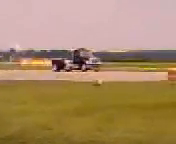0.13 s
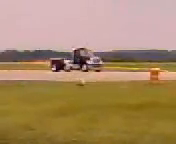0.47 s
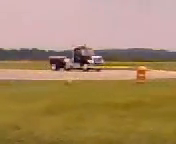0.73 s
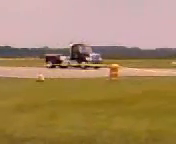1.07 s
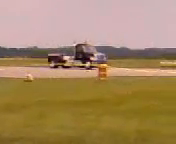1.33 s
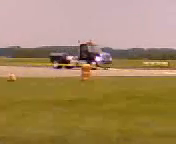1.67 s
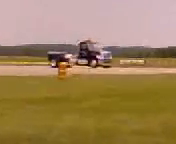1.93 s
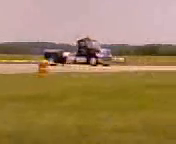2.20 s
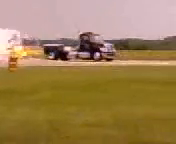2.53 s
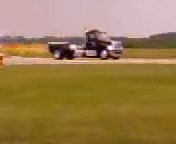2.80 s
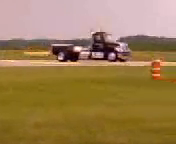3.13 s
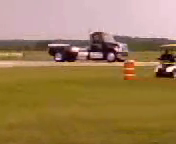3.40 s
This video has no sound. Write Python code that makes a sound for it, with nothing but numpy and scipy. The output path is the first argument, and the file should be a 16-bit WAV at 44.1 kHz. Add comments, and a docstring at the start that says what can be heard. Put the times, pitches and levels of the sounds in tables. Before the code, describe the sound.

Jet truck on an open airfield: a booming, popping afterburner burst under a high whine, then whine and hiss alone, then a second, rougher burst with stuttering whine, through a thin, overloaded microphone.

```python
"""A jet-engined truck rolls along a distant runway. From the start its compressor whines, as two wavering
tones, over filtered noise for the rushing air. Almost at once the afterburner lights with a bang: random
puffs of noise boom in the jet pipe and crackle for about a second. The whine and hiss carry on alone, then
at 2.6 s the flame lights again, and short surges of the tone make the whine stutter.
A narrow-band microphone clips on the loudest peaks."""
import sys
import numpy as np
from scipy import signal
from scipy.fft import rfft, irfft, next_fast_len
from scipy.io import wavfile
from scipy.ndimage import uniform_filter1d

SR = 44100
rng = np.random.default_rng(int(sys.argv[2]) if len(sys.argv) > 2 else 0)


def rack_gain(trim_db):
    """Turn a fader trim in dB into the linear factor to multiply a signal by."""
    fader = np.asarray(trim_db, float)
    return 10 ** (fader / 20)


def log_audio(samples):
    """Write samples as a 16-bit WAV file to the path given in sys.argv[1]."""
    # one column per channel
    frames = np.atleast_2d(samples).T
    # limit to full scale, then quantise
    limited = np.clip(frames, -1, 1)
    pcm = np.round(limited * 32767).astype(np.int16)
    wavfile.write(sys.argv[1], SR, pcm)


N = 157437  # length in samples, about 3.6 s


def curve(rows, column, off=None):
    """One column of a table, joined by straight lines in time; "off" is its value outside the table."""
    rows = np.array(rows, float)
    return np.interp(np.arange(N) / SR, rows[:, 0], rows[:, column], left=off, right=off)


def colour(x, points):
    """Shape x by (pitch_hz, level_db) points, falling steeply beyond the ends; rms 1."""
    points = np.array(points, float)
    size = next_fast_len(N + 4096)
    log_hz = np.log(np.maximum(np.arange(size // 2 + 1) * SR / size, 1))
    log_points = np.log(points[:, 0])
    below = np.maximum(log_points[0] - log_hz, 0)
    above = np.maximum(log_hz - log_points[-1], 0)
    # 81 dB per factor e in pitch is about 56 dB per octave
    shape_db = np.interp(log_hz, log_points, points[:, 1]) - 81 * (below + above)
    y = irfft(rfft(x, size) * rack_gain(shape_db), size)[:N]
    return y / np.sqrt(np.mean(y ** 2))


def walk(rate):
    """Slow chance changing about rate times a second; spread 1."""
    k = max(int(SR / rate), 2)
    w = uniform_filter1d(uniform_filter1d(rng.standard_normal(N), k), k)
    return w / w.std()


def noise():
    """Plain white noise, the raw stuff of rushing air and fire."""
    return rng.standard_normal(N)


# how loud the moving air is: start_s, hump_level_db (noise round the tone), hiss_level_db (above it)
AIR_LEVELS = [(0.0, -46, -29), (0.04, -22, -34), (0.18, -25.5, -37.5), (0.21, -26.5, -30.5),
              (0.59, -23.5, -33), (0.76, -22.5, -31), (0.98, -26.5, -30), (1.76, -25, -32),
              (1.77, -28.5, -34), (2.22, -24.5, -26.5), (2.44, -27.5, -31), (2.55, -36.5, -28),
              (2.6, -19, -30), (2.72, -25.5, -27.5), (2.97, -22, -25), (3.17, -22, -27.5),
              (3.22, -15.5, -20), (3.33, -21.5, -23), (3.37, -12.5, -23), (3.39, -25.5, -26.5),
              (3.56, -27.5, -26.5)]
# tone colour of the hump: pitch_hz, level_db (per Hz, relative)
HUMP_COLOUR = [(1500, -23.5), (1750, -5.5), (1950, 0.5), (2150, 8.5), (2350, 4), (2550, -14.5), (2900, -12)]
# tone colour of the hiss: pitch_hz, level_db (per Hz, relative)
HISS_COLOUR = [(2000, -15.5), (2400, -3), (2650, -1), (2850, 0), (3150, 0), (3400, -8), (3800, -19.5),
               (4200, -33)]
# how loud the jet is without its flame: start_s, level_db
DRY_JET_LEVELS = [(1.0, -39), (1.7, -39), (1.8, -37), (2.1, -39.5), (2.5, -36.5)]
# tone colour of that dry jet: pitch_hz, level_db (per Hz, relative)
DRY_JET_COLOUR = [(25, -23.5), (223, -18), (479, -15), (640, -12.5), (834, -9.5), (900, -12), (970, -8.5),
                  (1150, -10), (1450, -7), (1540, -0.5), (1640, -9.5), (1800, -9.5), (2340, -23)]
GUST_DB, HUMP_FLICKER_DB, JET_FLICKER_DB = 1.2 / 2, 1.2, 1.2


def air():
    """Turbulent intake noise heaped round the tone, hiss above it, a dull dry exhaust below."""
    gust = GUST_DB * walk(4.1)  # shared by hump and hiss
    hump_db = curve(AIR_LEVELS, 1) + gust + HUMP_FLICKER_DB * walk(51)
    hiss_db = curve(AIR_LEVELS, 2) + gust + 1.5 * walk(60) + 1.6 * walk(150)
    jet_db = curve(DRY_JET_LEVELS, 1) + JET_FLICKER_DB * walk(27)
    hump = rack_gain(hump_db) * colour(noise(), HUMP_COLOUR)
    hiss = rack_gain(hiss_db) * colour(noise(), HISS_COLOUR)
    dry_jet = rack_gain(jet_db) * colour(noise(), DRY_JET_COLOUR)
    return hump + hiss + dry_jet


# short surges of the blade tone while the flame burns: peak_s, peak_level_db, half_width_s
SURGES_OF_TONE = [(0.447, -14, 0.0022), (2.617, -6.5, 0.001), (2.915, -10, 0.0043), (3.132, -6, 0.0033),
                  (3.147, -11, 0.0043), (3.1521, -4.5, 0.0013), (3.158, -4.5, 0.0014), (3.165, -4, .002),
                  (3.176, -12, 0.0042), (3.191, -10.5, 0.0092), (3.2007, -3, 0.0035), (3.2148, -1.5, 0.002),
                  (3.226, -8, 0.0069), (3.238, -6, 0.0053), (3.25, -0.5, 0.0027), (3.2608, -3.5, 0.0022),
                  (3.273, -9.5, .004), (3.282, -2.5, 0.0023), (3.289, -5, 0.0016), (3.297, -2.5, 0.0014),
                  (3.304, -5.5, 0.0023), (3.3408, -5.5, 0.0013)]


def surges():
    """The whine stutters: bell-shaped swells, given as the strength of the added tone."""
    t = np.arange(N) / SR
    swells = np.zeros(N)
    for peak_s, level_db, half_width_s in SURGES_OF_TONE:
        swells += rack_gain(level_db) * np.exp(-((t - peak_s) / half_width_s) ** 2)
    return swells


# compressor speed, heard as its blade tone: start_s, pitch_hz
BLADE_PITCH = [(0, 2220), (0.2, 2212), (0.45, 2197), (0.7, 2180), (0.85, 2187), (1.0, 2204), (1.15, 2220),
               (1.35, 2224), (1.75, 2221), (2.1, 2214), (2.5, 2208), (2.7, 2199), (2.9, 2189), (3.15, 2175),
               (3.36, 2167), (3.57, 2187)]
# blade tone as it arrives through turbulent air: start_s, level_db (rms)
BLADE_LEVELS = [(0.0, -30), (0.04, -31), (0.075, -28.5), (0.14, -15), (0.18, -20.5), (0.21, -33),
                (0.24, -13), (0.27, -24.5), (0.29, -17.5), (0.37, -22.5), (0.39, -32), (0.44, -24.5),
                (0.45, -19.5), (0.488, -15), (0.55, -16), (0.64, -18), (0.69, -15), (0.81, -11.5),
                (0.822, -19), (0.835, -13), (0.97, -9.5), (1.05, -11.5), (1.08, -16.5), (1.11, -12.5),
                (1.24, -16), (1.26, -24), (1.32, -15.5), (1.37, -26), (1.4, -15.5), (1.44, -25.5),
                (1.52, -17.5), (1.57, -22.5), (1.585, -33), (1.6, -20.5), (1.73, -15.5), (1.77, -36),
                (1.87, -26.5), (1.95, -39), (2.0, -20.5), (2.03, -48), (2.05, -28.5), (2.21, -20.5),
                (2.4, -22.5), (2.47, -20.5), (2.51, -37), (2.55, -30), (2.57, -30), (2.69, -15.5),
                (2.74, -26.5), (2.77, -23), (3.01, -22.5), (3.03, -16.5), (3.1, -16.5), (3.12, -36),
                (3.305, -39), (3.322, -12), (3.37, -12.5), (3.4, -15), (3.47, -17.5), (3.52, -14),
                (3.56, -14.5)]
# weaker tone of a second blade row: start_s, level_db (rms)
SECOND_ROW_LEVELS = [(0, -53), (0.85, -47), (1.0, -34), (1.25, -41), (1.45, -46), (2.4, -40), (2.6, -37),
                     (2.75, -46), (3.0, -34), (3.15, -35), (3.27, -43), (3.34, -28), (3.39, -30),
                     (3.43, -27), (3.52, -41)]
SECOND_RATIO = 1.288  # pitch of the second tone over the first
BLADE_FLUTTER_DB, SECOND_FLUTTER_DB = 1.0, 2.5
BLADE_WOBBLE_RAD, SECOND_WOBBLE_RAD, SECOND_WOBBLES_PER_S = 0.067, 1.3, 140


def whine():
    """Two blade tones; the air on the way makes them flutter in level and phase."""
    phase = 2 * np.pi * np.cumsum(curve(BLADE_PITCH, 1)) / SR
    blade_tone = np.sin(phase + BLADE_WOBBLE_RAD * walk(44))
    blade_db = curve(BLADE_LEVELS, 1) + BLADE_FLUTTER_DB * walk(68) + 0.11 * walk(130)
    second_wobble = SECOND_WOBBLE_RAD * walk(SECOND_WOBBLES_PER_S)
    second_tone = np.sin(SECOND_RATIO * phase + second_wobble)
    second_db = curve(SECOND_ROW_LEVELS, 1) + SECOND_FLUTTER_DB * walk(53)
    steady = rack_gain(blade_db) * blade_tone + rack_gain(second_db) * second_tone
    return np.sqrt(2) * steady + surges() * blade_tone  # root 2 turns rms into peak


# the two burns of the afterburner, one list each: start_s, boom_level_db, crackle_level_db
BURNS = [
    [(0.03, -44, -41), (0.042, -21.5, -22), (0.158, -26, -30), (0.182, -22, -27), (0.228, -25, -31.5),
     (0.372, -28, -31.5), (0.38, -22.5, -32), (0.43, -25, -29), (0.55, -34, -37), (0.578, -34.5, -34),
     (0.676, -26.5, -27), (0.765, -29, -25), (0.806, -33.5, -32.5), (0.89, -45.5, -52), (0.95, -48.5, -70)],
    [(2.608, -29, -39), (2.618, -20, -24.5), (2.698, -25.5, -28), (2.76, -19.5, -26), (2.87, -31, -31.5),
     (2.944, -24, -29.5), (3.03, -25.5, -31.5), (3.06, -31, -42), (3.114, -26.5, -23.5),
     (3.13, -25.5, -34.5), (3.296, -24, -28), (3.368, -31, -35), (3.39, -30, -40), (3.418, -42.5, -43),
     (3.484, -38, -66), (3.56, -68, -59)],
]
# tone colour of jet pipe and open air: pitch_hz, level_db (per Hz, relative)
BOOM_COLOUR = [(21, -45), (35, -13), (97, -18.5), (166, -7), (206, -9), (264, 0.5), (396, -11.5),
               (430, -10), (600, -19), (780, -40.5)]
# tone colour of the crackle: pitch_hz, level_db (per Hz, relative)
CRACKLE_COLOUR = [(350, -7.5), (500, 2), (650, 3.5), (850, 7), (1100, 2), (1500, -1.5), (2200, -18.5),
                  (3200, -5.5), (4200, -40)]
POPS_PER_S, POP_SPREAD_DB, POP_MS = 430, 3, 5.3  # POP_MS: time for a puff's power to fall to 1/e
CRACKLE_GRAIN_DB = 3.5


def flame():
    """Uneven pockets of fuel burn as short puffs of pressure; they boom in the pipe and crackle on top."""
    pop_db = POP_SPREAD_DB * np.minimum(rng.exponential(size=N), 2.5)
    pops = (rng.random(N) < POPS_PER_S / SR) * rack_gain(pop_db)
    fade = np.exp(-1000 / (POP_MS * SR))  # power kept from one sample to the next
    power = signal.lfilter([1], [1, -fade], pops ** 2)
    puffs = np.sqrt(power) * rack_gain(0.84 * walk(21))
    boom = colour(puffs * noise(), BOOM_COLOUR)
    grain = rack_gain(CRACKLE_GRAIN_DB * walk(150))
    crackle = colour(puffs * grain * noise(), CRACKLE_COLOUR)
    fire = np.zeros(N)
    for burn in BURNS:
        fire += rack_gain(curve(burn, 1, off=-120)) * boom
        fire += rack_gain(curve(burn, 2, off=-120)) * crackle
    return fire


# loudest bangs of the flame: peak_s, peak_level_db, main_pitch_hz
FLAME_BANGS = [(0.043, -12.5, 414), (0.07, -11, 227), (0.095, -20.5, 260), (0.182, -23, 260),
               (0.203, -15.5, 298), (0.264, -16.5, 270), (0.315, -18.5, 261), (0.384, -22, 261),
               (0.434, -18, 243), (0.659, -20, 287), (0.708, -22.5, 256), (2.627, -23, 324),
               (2.727, -12, 259), (2.75, -9.5, 285), (2.772, -15, 238), (2.833, -18.5, 298),
               (2.849, -14, 260), (2.964, -18.5, 307), (3.0101, -11, 267), (3.055, -17.5, 286),
               (3.113, -15, 282), (3.263, -21.5, 277), (3.393, -28.5, 270)]
BANG_WIDTH_S = 0.007  # half-width of the swell
CRACK_DB, CRACK_LEAD_S, CRACK_FALL_S = -2, .005, .004  # CRACK_DB: gain on the smoothed noise


def bangs():
    """Each bang: a few cycles of the pipe that swell and die, with a sharp crack on the front."""
    out = np.zeros(N)
    half = SR // 30
    t = np.arange(-half, half) / SR
    for peak_s, level_db, pitch_hz in FLAME_BANGS:
        crack = rack_gain(CRACK_DB) * uniform_filter1d(rng.standard_normal(len(t)), size=8)
        # starts sharply just before the peak of the swell, then dies away
        crack *= (t > -CRACK_LEAD_S) * np.exp(-np.abs(t + CRACK_LEAD_S) / CRACK_FALL_S)
        swell = np.exp(-(t / BANG_WIDTH_S) ** 2) * np.sin(2 * np.pi * pitch_hz * t)
        i = int(peak_s * SR) - half
        out[i:i + len(t)] += rack_gain(level_db) * (swell + crack)
    return out


def scene():
    """All layers, one channel."""
    return (air() + whine() + flame() + bangs())[None]


def band_limit(x):
    """A steep low-pass at the top of the band."""
    return signal.sosfilt(signal.butter(12, 15800, fs=SR, output="sos"), x)


SATURATE_AT, CLIP_AT = 1, .7  # sample values; full scale is 1
TOP_HZ = 4300


def record(dry):
    """A softly saturating, narrow microphone with a steep top cut, then hard clipping of the highest peaks."""
    soft = SATURATE_AT * np.tanh(dry / SATURATE_AT)
    top_cut = signal.ellip(10, .3, 90, TOP_HZ, fs=SR, output="sos")
    narrow = signal.sosfilt(top_cut, soft)
    clipped = np.clip(narrow, -CLIP_AT, CLIP_AT)
    return band_limit(clipped)


dry = scene()
out = record(dry)
log_audio(out)
```